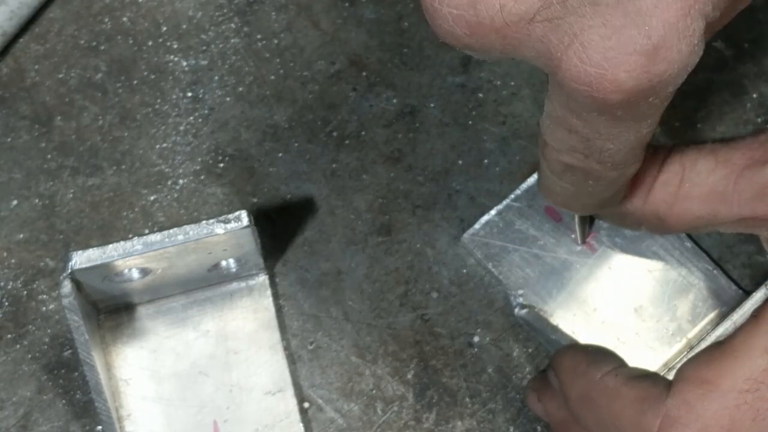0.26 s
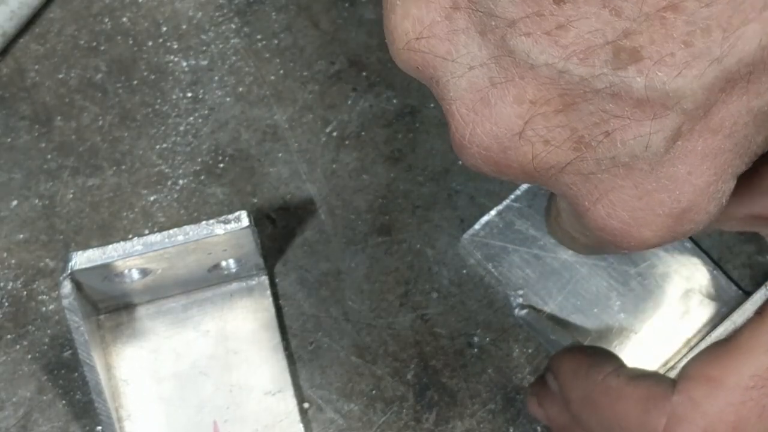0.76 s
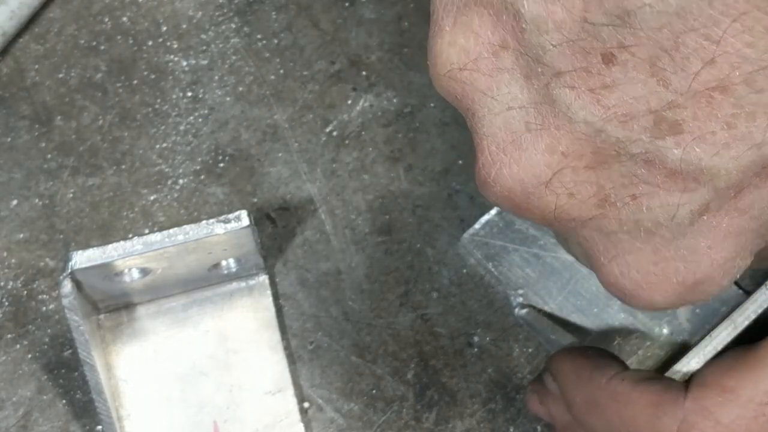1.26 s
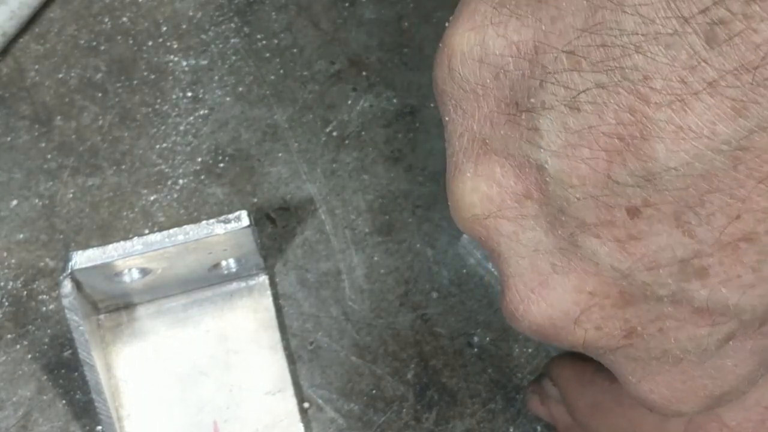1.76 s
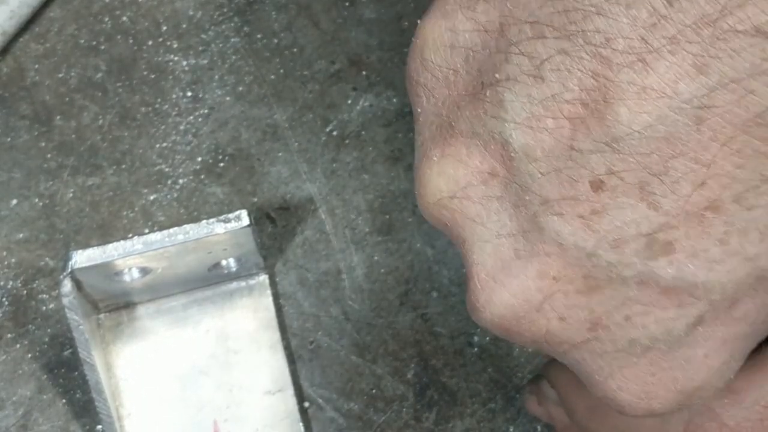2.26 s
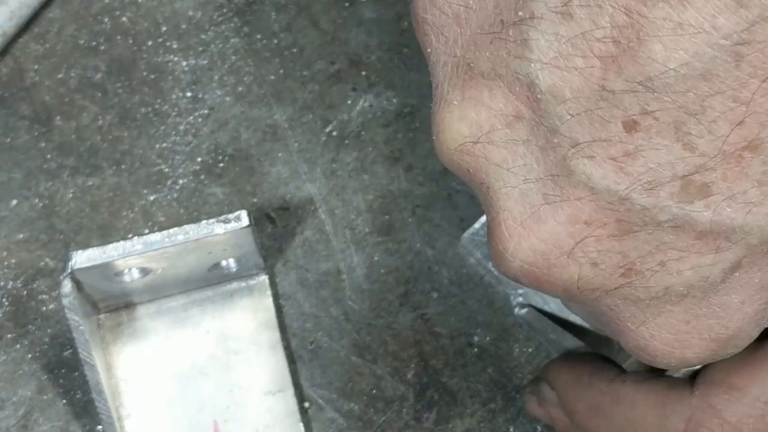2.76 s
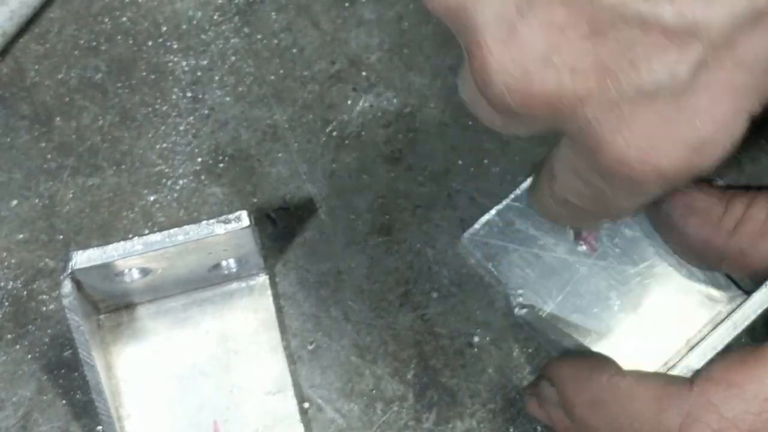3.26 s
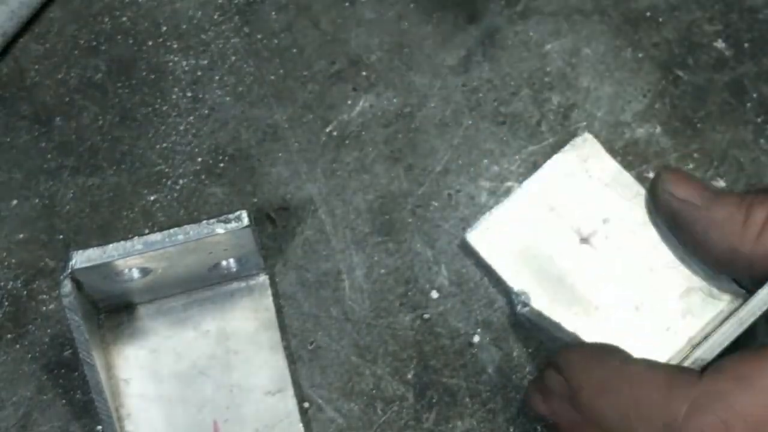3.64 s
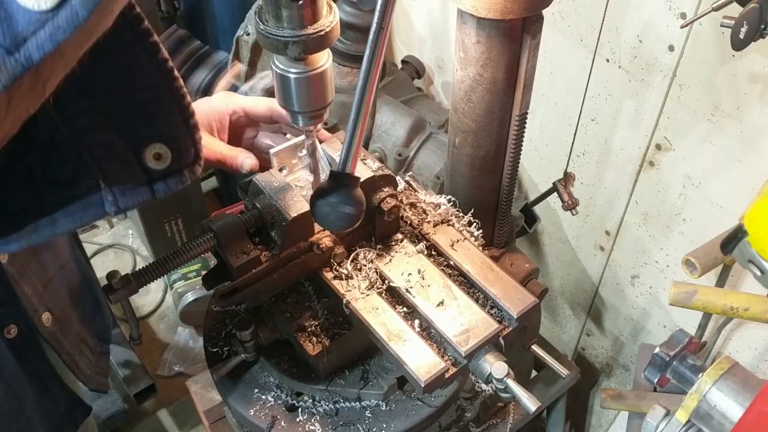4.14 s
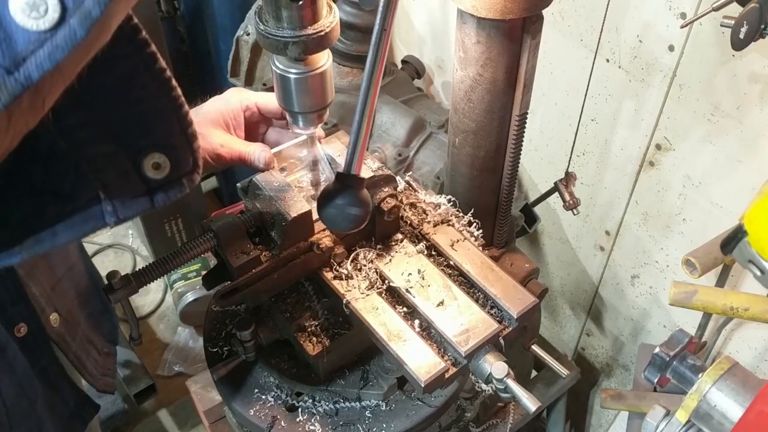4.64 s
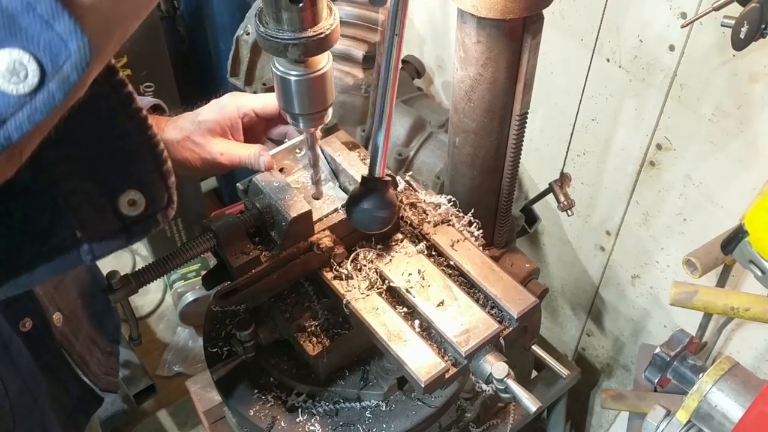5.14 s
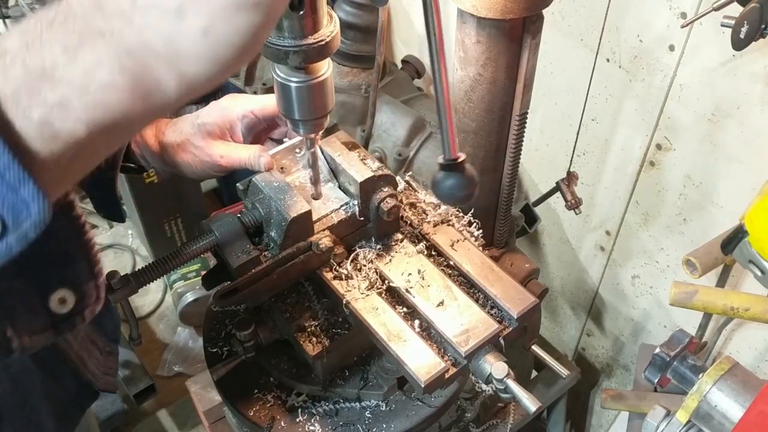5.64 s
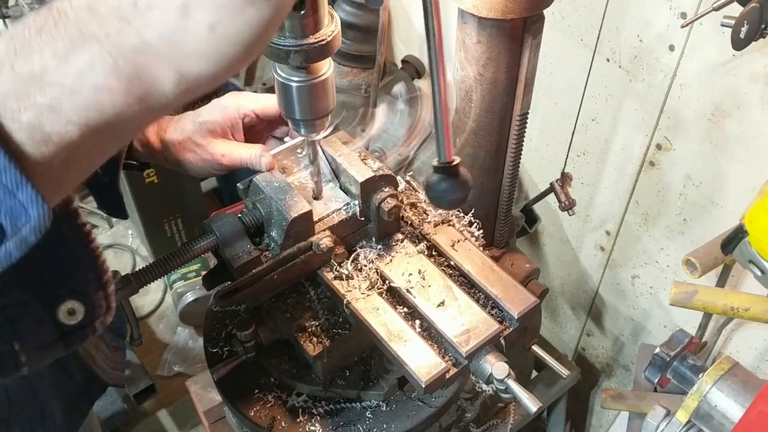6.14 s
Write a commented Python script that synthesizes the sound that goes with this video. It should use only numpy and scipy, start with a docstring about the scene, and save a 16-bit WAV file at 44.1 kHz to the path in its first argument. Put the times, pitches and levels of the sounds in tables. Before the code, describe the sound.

A spring-loaded centre punch snaps sharply three times on metal with small clicks, then abruptly a drill press hums, rattles and scrapes through a bracket.

```python
"""A small workshop: an automatic centre punch is pressed three times into an aluminium bracket on a bench, nearby.
Its spring scrapes (friction through barrel resonances), the hammer snaps and the mechanism clicks as it resets
(noise cracks, decaying modes, echo). Then, abruptly, a running drill press hums (wandering sines) and rattles
(resonant grains) while its bit scrapes the bracket, grabbing once a turn as it breaks through (swelling noise)."""
import sys
import numpy as np
from scipy import signal
from scipy.fft import rfft, irfft, next_fast_len
from scipy.io import wavfile

SR = 44100
rng = np.random.default_rng(int(sys.argv[2]) if len(sys.argv) > 2 else 0)


def inscribe(sig):
    """Save sig as 16-bit PCM at rate SR to the path in sys.argv[1].

    A 1-D sig is mono; a 2-D sig holds one channel per row.
    Samples are clipped to [-1, 1] before scaling.
    """
    pcm = np.round(np.clip(np.atleast_2d(sig).T, -1, 1) * 32767)
    wavfile.write(sys.argv[1], SR, pcm.astype(np.int16))


N = 282342
T = np.arange(N) / SR
PADDED = next_fast_len(N, real=True)
FREQ = np.fft.rfftfreq(PADDED, 1 / SR)

# still air of the workshop: [f/Hz, spectral level/dB per Hz]
AIR_SPECTRUM = [(40, -12), (55, -0.5), (90, -6), (125, -3), (200, -9), (290, -13), (460, -19.5),
                (1370, -26), (4700, -29), (5800, -34.5), (7500, -31.5), (9500, -41), (16000, -34.5)]
# echo of the workshop: [f/Hz, level/dB, t60/s]
ROOM_DECAY = [(100, -5.5, .4), (301.6, 6, 0.39), (800, 6, 0.35), (1500, 3, 0.49), (2400, 3, 0.45),
              (4500, -8, 0.41), (6500, -8.5, 0.46), (9000, -10.5, 0.33), (15000, -20.5, .3)]
# plunger sliding against its spring: [start t/s, end t/s, level at the end/dB]
SPRING_SCRAPES = [(0.371, .398, -63), (0.726, 0.755, -65), (1.384, 1.449, -63), (1.45, 1.52, -72.5),
                  (1.647, 1.703, -46), (2.193, 2.211, -35.5), (2.5, 2.531, -51), (2.913, 2.949, -39),
                  (3.202, 3.279, -56.5)]
# resonances of the punch's barrel: [f/Hz, width/Hz, level/dB]
BARREL_RESONANCES = [(1300, 80, -5), (1900, 180, -3.5), (2570, 190, -3.5), (3250, 70, 2.5), (3260, 84, -8),
                     (4550, 250, -2.5), (8000, 2000, -18)]
# tip set down and mechanism resetting: [t/s, level/dB, hardness of contact/dB, strongest ring f/Hz]
RESET_CLICKS = [(0.3976, -48.5, -3.5, 2570), (0.41, -58, -3, 2500), (0.729, -58.5, -12, 330),
                (0.759, -30.5, -3, 2460), (1.568, -51, -2.5, 2500), (1.679, -47, -3, 3015),
                (1.9371, -41.5, -10.5, 1150), (2.0036, -50.5, -2, 3470), (2.0302, -48, 5, 3510),
                (2.1159, -28.5, -4, 3460), (2.186, -45.5, 5, 3480), (2.368, -42, -8, 1145),
                (2.53, -27, 10, 3120), (2.541, -25, -5.5, 1150), (2.6826, -32, -4, 3696),
                (2.7654, -47, 9, 3710), (2.8531, -30.5, -3.5, 3352), (2.9238, -49, 3, 3710),
                (3.155, -50, -10, 1150), (3.2791, -49.5, 8.5, 3600)]
# hammer snaps: [t/s, level/dB, body re level/dB, tick re level/dB, strongest ring f/Hz, bench thump level/dB]
HAMMER_SNAPS = [(1.7034, -18.5, -11, 2, 4500, -43.5), (2.2108, -17.5, -9.5, 1.8, 1000, -28.5),
                (2.9486, -16, -10.5, 1, 1500, -28)]
# modes of punch, bracket and bench: [f/Hz, level/dB, t60/s]
METAL_MODES = [(296, 0.5, .14), (469, -1, 0.12), (845, 2.5, .1), (1092, 2, 0.099), (1194, -2.5, 0.12),
               (1350, -2, 0.12), (1570, 4, 0.058), (1907, 2, 0.071), (2090, 1, 0.082), (2330, 1.5, .1),
               (2520, -1.5, .11), (2910, -6, 0.071), (3353, 4.5, 0.041), (3700, -12.5, .13),
               (3940, -7.5, 0.087), (4210, -3.5, .06), (4540, -1, 0.044), (4854, -10.5, .07),
               (5430, -14, 0.062), (6066, -2, 0.027), (6540, -17, .09), (6740, -9, 0.064),
               (7000, -0.5, 0.02), (7300, -14, .06), (8330, -1.5, .05), (9260, -4.5, .06), (11700, -4, .06),
               (14600, -8, .04)]
# brief crack of steel on metal: [f/Hz, spectral level/dB per Hz]
CRACK_SPECTRUM = [(150, 4.5), (400, -11), (700, -1.5), (1500, 2.5), (2800, -2), (4500, -3), (5400, -11),
                  (6500, -2), (8000, -6), (9000, -11.5), (13000, -13), (15500, -16)]
# motor and pulley tones: [f/Hz, level at the start/dB, level at the end/dB, pitch wander/share of f]
MOTOR_TONES = [(119.8, -57, -58, .002), (200, -69, -70, .01), (268.5, -65, -58, .005),
               (375.5, -57, -69, .006), (797, -64, -72, .003), (1365, -65, -68, .002),
               (1807, -63, -62, .002), (1924, -58, -58, .0015), (2673, -66, -63, .001),
               (3349, -70, -65, .001), (4468, -68, -65, .001)]
# broad rattle of belt and bearings: [f/Hz, spectral level/dB per Hz]
RATTLE_SPECTRUM = [(50, -42.5), (80, -2), (150, -1.5), (300, 4.5), (420, -4.5), (700, 5.5), (950, -4.5),
                   (1600, 2.5), (2400, -1.5), (3000, -6.5), (4100, -2), (7500, -13.5), (10000, -17),
                   (15500, -39)]
# resonances of the drill's head and quill: [f/Hz, width/Hz, level/dB]
HEAD_RESONANCES = [(1925, 50, 5), (2560, 140, -2), (2700, 200, 1), (3235, 80, -2), (3350, 70, -1),
                   (3465, 80, -1), (3708, 50, -2), (4435, 170, 1), (4750, 260, -8), (5190, 110, -9),
                   (5780, 110, -3), (6000, 300, -10), (6450, 400, -12), (6830, 100, -10), (7120, 100, -6),
                   (7450, 300, -12), (8290, 240, -7), (9040, 260, -10), (10050, 250, -17),
                   (10560, 260, -11), (11600, 400, -19), (12110, 130, -14), (13450, 220, -21),
                   (15120, 260, -15)]
# scraping of the cutting edge: [f/Hz, spectral level/dB per Hz]
CUT_SPECTRUM = [(200, -3), (500, -5), (1000, -0.5), (1600, 4.5), (2700, 4.5), (4000, -1), (8000, -12.5),
                (15000, -23.5)]
# ring of the vice: [f/Hz, width/Hz, level/dB]
VICE_RESONANCES = [(935, 42, 4), (1100, 65, 0), (776, 53, -5)]
# point juddering while it seats in the punch mark: [t/s, half length/s, level/dB]
SEATING_JUDDERS = [(3.973, 0.062, -45.5), (4.17, 0.1, -50), (4.525, 0.074, -50.5)]
# chips snapping off: [t/s, level/dB, bracket squawk f/Hz]
CHIP_BREAKS = [(4.34, -52, 3200), (4.44, -51, 2680), (4.601, -48, 3200), (4.768, -43, 1750),
               (4.814, -41.5, 2660), (4.862, -39, 1315), (5.512, -44.5, 2700), (5.616, -46, 2470),
               (5.915, -51, 1880)]

AIR_DB = -66.5  # before the drill runs
# body and tick of a middling click, relative to its level
CLICK_BODY_DB, CLICK_TICK_DB = -10.5, -10.5
HOLD_S = .0024  # a snap's crack stays at full level this long before it decays
# the hand strains on the bench: hardest moment, half length and level of the rumble
STRAIN_S, STRAIN_LENGTH_S, STRAIN_DB = 2.6, .14, -55
SKIN_DB = -69  # hiss of the hand's grip on the punch
DRILL_START_S, SPINDLE_HZ, MAINS_HZ = 3.932, 8.37, 60
HUM_FLUTTER_DB = 1.1  # spread of each motor tone's swelling and sinking
# under full feed the lips scrape and the vice rings; both die away as the point breaks through
SCRAPE_DB, VICE_DB, BREAKTHROUGH_S, RELEASE_S = -47.5, -59.5, 5.0, 0.4
SQUEAK_DB = 4.5  # gain of the curling chips' squeaks, relative to their scraping
# the flutes sing faintly in the hole under feed, and swell when the bit is deepest
SING_HZ, SING_DB, DEEPEST_DB, DEEPEST_S, DEEPEST_LENGTH_S = 1701, -62, -52.5, 4.78, 0.22
CHIP_LENGTH_S, CHIP_SQUAWK_DB = 0.0077, 4
# breaking through, the bit grabs once a turn, less hard before and after the worst grab
FIRST_GRAB_S, GRAB_LENGTH_S, WORST_GRAB_S, GRAB_DB, GRAB_FALL_DB_PER_S = 4.714, 0.022, 5.014, -37, 31
# as the metal under the bit thins, each grab squawks higher
SQUAWK_HZ, SQUAWK_RISE_HZ_PER_S, SQUAWK_DB = 2050, 2800, -1.5
# the vice rings with each grab, most when the bit is nearly through; its swell is centred this much later
SHAKE_DB, WORST_SHAKE_S, SHAKE_FALL_DB_PER_S, SHAKE_LAG_S = -38, 5.09, 30, 0.014
# then the lips clear the burr, rattling the vice
BURR_S, BURR_LENGTH_S, BURR_SCRAPE_DB, BURR_VICE_DB = 5.484, 0.22, -52, -50
# and the flutes rub more and more in the finished hole
RUB_START_S, RUB_DB = 5.6, -48.5
TOP_HZ = 15900  # upper limit of the microphone


def undb(db):
    """Amplitude ratio: 20 dB is a factor of ten."""
    return 10 ** (np.asarray(db) / 20)


def unit(x):
    """Normalisation of the signal to an rms of 1."""
    return x / np.sqrt(np.mean(x ** 2) + 1e-20)


def decay(t, t60):
    """Exponential damping: the amplitude falls by 60 dB in t60."""
    return np.exp(-np.log(1000) * t / t60)


def colour(points):
    """Spectral envelope: levels interpolated over log frequency, falling away below the first point."""
    hz, db = np.transpose(points)
    level_db = np.interp(np.log(FREQ + 1), np.log(hz), db)
    return undb(level_db) * np.minimum(FREQ / hz[0], 1) ** 2


def resonances(rows):
    """Incoherent superposition: the powers of damped resonators (f/Hz, width/Hz, level/dB) add."""
    power = 0
    for hz, width, db in rows:
        detuning = (FREQ ** 2 - hz ** 2) / (width * (FREQ + 1))
        power = power + undb(db) ** 2 / (1 + detuning ** 2)
    return np.sqrt(power)


def shaped(x, response):
    """Linear filtering: the spectrum is multiplied by a response, then scaled to an rms of 1."""
    return unit(irfft(rfft(x, PADDED) * response, PADDED)[:N])


def band(x, lo_hz, hi_hz, order=2):
    """Causal band-pass filtering."""
    edges = [lo_hz, min(hi_hz, .48 * SR)]
    return signal.sosfilt(signal.butter(order, edges, "band", fs=SR, output="sos"), x)


def walk(rate_hz):
    """Random modulation: low-passed Gaussian noise with a spread of 1."""
    return shaped(rng.standard_normal(N), np.exp(-(FREQ / rate_hz) ** 2))


def grains(rate_hz, spread_db):
    """Shot noise: sliding contact as dense tiny impacts of uneven size."""
    happens = rng.random(N) < rate_hz / SR
    size_db = spread_db * np.minimum(rng.exponential(size=N), 4)
    return unit(happens * rng.standard_normal(N) * undb(size_db))


def swell(s, length_s):
    """Gaussian envelope: a smooth rise and fall around a moment."""
    return np.exp(-((T - s) / length_s) ** 2)


def ramp(s, length_s):
    """Linear envelope: a straight rise from 0 to 1 that starts at a moment."""
    return np.clip((T - s) / length_s, 0, 1)


def add(track, s, x):
    """Superposition of a sound x on the track at a time."""
    i = int(s * SR)
    track[i:i + len(x)] += x[:N - i]


def still_air(running):
    """Broadband noise: the coloured air wavers in level, and lies 4 dB lower while the drill runs."""
    level = undb(AIR_DB + 0.93 * walk(6.8)) * undb(-4 * running)
    return level * shaped(rng.standard_normal(N), colour(AIR_SPECTRUM))


def echo(onset_s=0.007):
    """Reverberation: dense reflections from near walls, of energy 1; the highest treble dies first."""
    t = T[:SR * 3 // 4]
    hz, db, t60 = np.transpose(ROOM_DECAY)
    noise = rfft(rng.standard_normal(len(t)))
    freq = np.fft.rfftfreq(len(t), 1 / SR)
    out = 0
    for share, band_db, band_t60 in zip(np.eye(len(hz)), db, t60):
        weight = np.interp(np.log(freq + 1), np.log(hz), share) * np.minimum(freq / hz[0], 1) ** 2
        out = out + undb(band_db) * irfft(noise * weight, len(t)) * decay(t, band_t60)
    out = out * np.clip(t / onset_s - 1, 0, 1)  # silent until the first reflection
    return out / np.sqrt(np.sum(out ** 2))


def workshop(x, wet_db):
    """Convolution: the direct sound together with its echo."""
    return x + undb(wet_db) * signal.fftconvolve(x, echo())[:N]


def spring_scrapes():
    """Sliding friction: grains excite the barrel, ever harder as the plunger compresses its spring."""
    response = resonances(BARREL_RESONANCES) / (1 + (FREQ / 7000) ** 2)
    friction = shaped(grains(4000, 2.5), response)
    pressure = 0
    for start, end, db in SPRING_SCRAPES:
        pressure = pressure + undb(db) * np.interp(T, [start, end], [1 / 20, 1], left=0, right=0)
    return workshop(pressure * friction, wet_db=-9.5)


def metal_ring(t, ring_hz, focus_db):
    """Modal synthesis: the place of the blow decides which damped modes ring most; no two blows are alike."""
    hz, mode_db, t60 = np.transpose(METAL_MODES)[:, :, None]
    nearness = np.exp(-(np.log(hz / ring_hz) / 0.28) ** 2)
    gain = undb(mode_db + focus_db * nearness + rng.standard_normal(hz.shape))
    polarity = (-1) ** np.arange(len(METAL_MODES))[:, None]
    return np.sum(polarity * gain * np.sin(2 * np.pi * hz * t) * decay(t, t60), axis=0)


def blow(db, body_db, tick_db, hold_s, crack_t60, rattle_db, ring_db, wet_db, ring_hz, focus_db, echo_top_hz):
    """Impact: a noise crack holds its level for a moment, then decays; the metal rings, the room answers."""
    tail = band(echo(), 100, echo_top_hz, order=1)  # the walls return little of the top
    t = T[:len(tail)]
    fade = decay(np.maximum(t - hold_s, 0), crack_t60) + undb(rattle_db) * decay(t, 0.11)
    crack = shaped(rng.standard_normal(N), colour(CRACK_SPECTRUM))[:len(t)] * fade
    sound = crack + undb(ring_db) * metal_ring(t, ring_hz, focus_db)
    sound = sound + undb(wet_db) * np.sqrt(np.sum(sound ** 2)) * tail
    body = band(sound, 220, 1400)
    clack = band(sound, 1400, 5000, order=4)
    tick = band(sound, 5000, 17000, order=4)
    out = 0
    for part, rel_db in zip((body, clack, tick), (body_db, 0, tick_db)):
        strength = np.std(part[:SR // 100])  # over the first 10 ms
        out = out + undb(db + rel_db) * part / strength
    return out


def reset_clicks():
    """Light impacts: a harder contact trades body for tick."""
    out = np.zeros(N)
    for s, db, hard_db, hz in RESET_CLICKS:
        click = blow(db, CLICK_BODY_DB - hard_db, CLICK_TICK_DB + hard_db, hold_s=0.00024, crack_t60=0.01,
                     rattle_db=-10.0, ring_db=-16, wet_db=-9.5, ring_hz=hz, focus_db=7, echo_top_hz=3500)
        add(out, s, click)
    return out


def thump(db, hz=62, t60=.11):
    """Recoil: the bench shakes for a few damped cycles."""
    t = T[:SR // 4]
    return undb(db) * band(np.sin(2 * np.pi * hz * t) * decay(t, t60), 45, 300, order=3)


def hammer_snaps():
    """Released spring energy: the hammer strikes the tip and the recoil reaches the bench."""
    out = np.zeros(N)
    for s, db, body_db, tick_db, hz, thump_db in HAMMER_SNAPS:
        snap = blow(db, body_db, tick_db, hold_s=HOLD_S, crack_t60=0.0079, rattle_db=-11.0,
                    ring_db=-17.0, wet_db=-13.5, ring_hz=hz, focus_db=7, echo_top_hz=16000)
        add(out, s, snap)
        add(out, s, thump(thump_db))
    return out


def grip():
    """Dry friction: skin rubs faintly on the punch while the hand strains."""
    hiss = unit(band(grains(5000, 1.5), 3000, 14000, order=1))
    return undb(SKIN_DB) * swell(STRAIN_S, length_s=0.46) * hiss


def bench_rumble():
    """Forced vibration: low resonances of the bench shudder under the pressing hand."""
    strain = undb(STRAIN_DB) * swell(STRAIN_S, STRAIN_LENGTH_S)
    response = resonances([(58, 19, 0.5), (108, 33, 3.5)]) ** 2
    return strain * shaped(rng.standard_normal(N), response)


def tone(hz, wander):
    """Frequency modulation: a sine of rms 1 whose pitch wanders by a share."""
    pitch_hz = hz * (1 + wander * walk(13.2))
    return np.sqrt(2) * np.sin(2 * np.pi * np.cumsum(pitch_hz) / SR)


def motor():
    """Rotating machinery: hum and pulley whine over bearing rattle that pulses with the motor's torque."""
    progress = np.clip((T - DRILL_START_S) / (T[-1] - DRILL_START_S), 0, 1)
    hum = 0
    for hz, first_db, last_db, wander in MOTOR_TONES:
        level_db = first_db + (last_db - first_db) * progress + HUM_FLUTTER_DB * walk(39)
        hum = hum + tone(hz, wander) * undb(level_db)
    # harmonics of twice the mains frequency
    torque = 1 + sum(.14 * np.cos(2 * np.pi * 2 * k * MAINS_HZ * T) for k in (1, 2, 3))
    turn = undb(0.14 * np.sin(2 * np.pi * 2 * SPINDLE_HZ * T) + 0.63 * walk(25))
    casting_power = 0
    for hz, width, db in HEAD_RESONANCES:  # steep, with dark gaps between
        casting_power = casting_power + undb(db) ** 2 * resonances([(hz, width, 0)]) ** 4
    rattle = shaped(grains(8000, 1.0) * torque, colour(RATTLE_SPECTRUM)) * undb(-49.5 - 0.43 * progress)
    head = shaped(grains(4000, 1.1) * torque, np.sqrt(casting_power)) * undb(-48.5)
    return hum + workshop(turn * (rattle + head), wet_db=-8.0)


def chip_squeaks(hz=1800, spread=0.2, length_s=0.012):
    """Frictional vibration: each passing lip curls a chip, which squeaks at a gliding pitch of its own."""
    out, t = np.zeros(N), T[:SR // 16]
    envelope = np.exp(-((t - t[-1] / 2) / length_s) ** 2)
    passes = np.arange(DRILL_START_S, T[-1] - .1, 1 / (2 * SPINDLE_HZ))
    for s, (late, pitch, glide, size) in zip(passes, rng.standard_normal((len(passes), 4))):
        phase = 2 * np.pi * np.cumsum(hz * np.exp(spread * pitch + 2 * glide * t)) / SR
        add(out, s + 0.0084 * late, undb(1.6 * size) * np.sin(phase) * envelope)
    return out


def squawk(hz, width_hz=130):
    """Narrow-band resonance: the bracket rings roughly under the cutting edge."""
    return shaped(rng.standard_normal(N), resonances([(hz, width_hz, 0)]))


def chip_breaks(rasp):
    """Sudden release: each chip that snaps off gives a short rasp and a squawk of the bracket."""
    out = np.zeros(N)
    for s, db, hz in CHIP_BREAKS:
        out += undb(db) * swell(s, CHIP_LENGTH_S) * (rasp + undb(CHIP_SQUAWK_DB) * squawk(hz))
    return out


def grabs(rasp, vice, count):
    """Periodic forcing: once a turn the bit catches; the edge rasps, the bracket squawks, the vice rings."""
    out = np.zeros(N)
    for since in np.arange(count) / SPINDLE_HZ:
        s = FIRST_GRAB_S + since
        edge = rasp + undb(SQUAWK_DB) * squawk(SQUAWK_HZ + SQUAWK_RISE_HZ_PER_S * since)
        force = undb(GRAB_DB - GRAB_FALL_DB_PER_S * abs(s - WORST_GRAB_S))
        shake = undb(SHAKE_DB - SHAKE_FALL_DB_PER_S * abs(s - WORST_SHAKE_S))
        out += force * swell(s, GRAB_LENGTH_S) * edge
        out += shake * swell(s + SHAKE_LAG_S, GRAB_LENGTH_S) * vice
    return out


def cutting():
    """Stick-slip and resonance: two lips scrape off chips, grab on breaking through, and shake the vice."""
    feed = 1 - ramp(BREAKTHROUGH_S - RELEASE_S, RELEASE_S)
    burr = swell(BURR_S, BURR_LENGTH_S)
    rub = ramp(RUB_START_S, T[-1] - RUB_START_S)
    scraping = undb(SCRAPE_DB) * feed + undb(BURR_SCRAPE_DB) * burr + undb(RUB_DB) * rub
    ringing = undb(VICE_DB) * feed + undb(BURR_VICE_DB) * burr
    seating = sum(undb(db) * swell(s, length) for s, length, db in SEATING_JUDDERS)
    singing = undb(SING_DB) * feed + undb(DEEPEST_DB) * swell(DEEPEST_S, DEEPEST_LENGTH_S)
    lips = undb(1.7 * np.sin(2 * np.pi * 2 * SPINDLE_HZ * T) + 0.81 * walk(40))  # two passes a turn
    chips = shaped(grains(1800, 2), colour(CUT_SPECTRUM))
    vice = shaped(grains(3000, 0.65), resonances(VICE_RESONANCES))
    judder_response = resonances([(271, 96, 4), (350, 44, -3.5), (487, 72, 1.0), (646, 260, 2.0)]) ** 2
    judder = shaped(grains(430, 2.6), judder_response)
    out = scraping * (lips * chips + undb(SQUEAK_DB) * chip_squeaks())
    out += lips * (ringing * vice + seating * judder + singing * tone(SING_HZ, wander=0.00296))
    rasp = undb(2.1 * walk(200)) * chips  # the edge sticks and slips
    return out + chip_breaks(rasp) + grabs(rasp, vice, count=6)


def scene():
    """Superposition of sources: the punch in still air, then the drill press."""
    running = ramp(DRILL_START_S, 0.0041)
    punch = spring_scrapes() + reset_clicks() + hammer_snaps()
    hand = grip() + bench_rumble()
    drill = running * (motor() + workshop(cutting(), wet_db=-17))
    return (still_air(running) + punch + hand + drill)[None]


def record(dry, ceiling=0.68):
    """Saturation and band limit: the microphone rounds the peaks of the snaps and the top is cut."""
    rounded = ceiling * np.tanh(dry / ceiling)
    return signal.sosfilt(signal.ellip(8, .2, 70, TOP_HZ, fs=SR, output="sos"), rounded)


dry = scene()
out = record(dry)
inscribe(out)
```